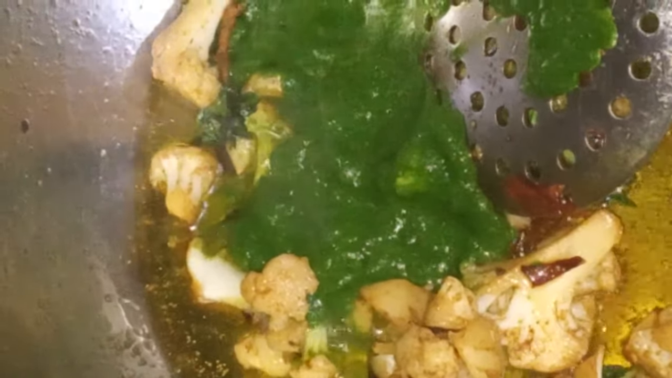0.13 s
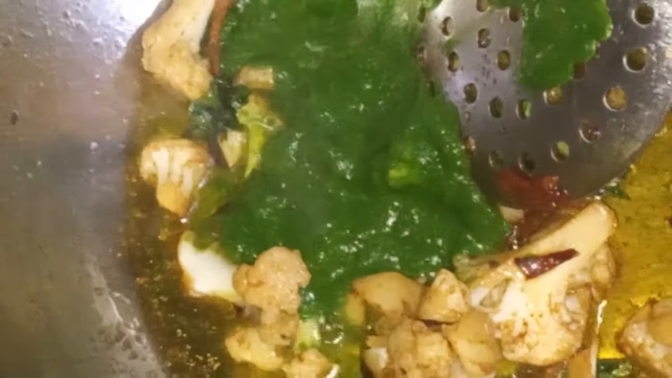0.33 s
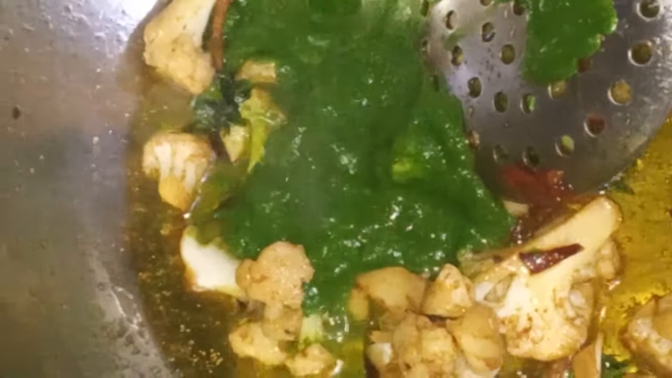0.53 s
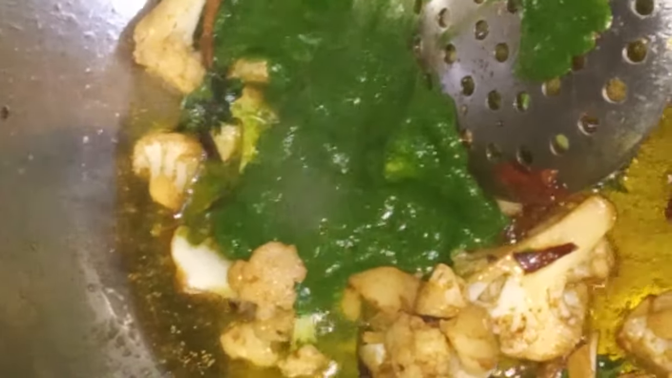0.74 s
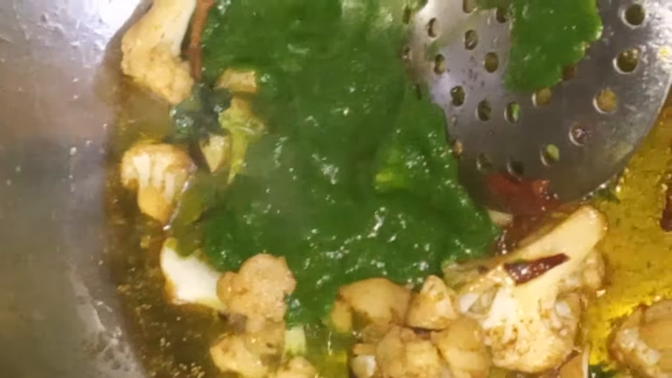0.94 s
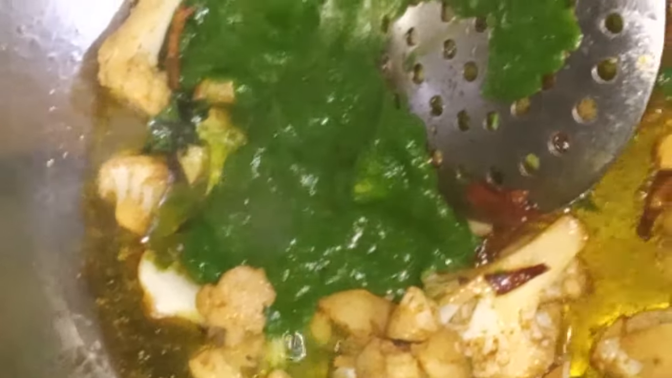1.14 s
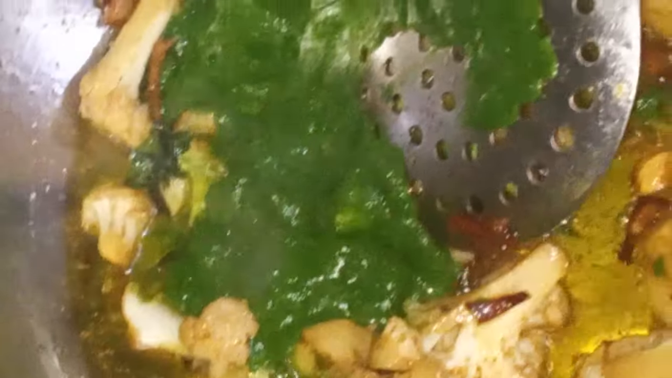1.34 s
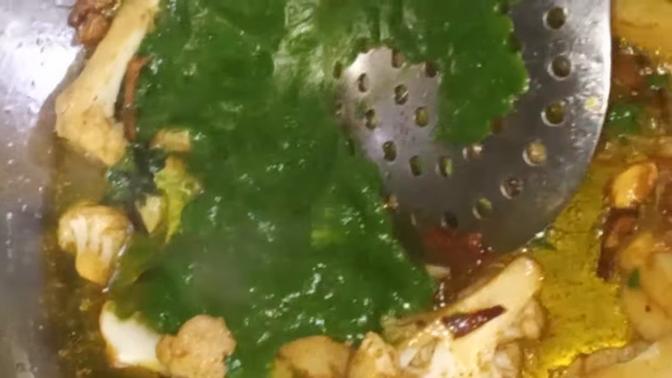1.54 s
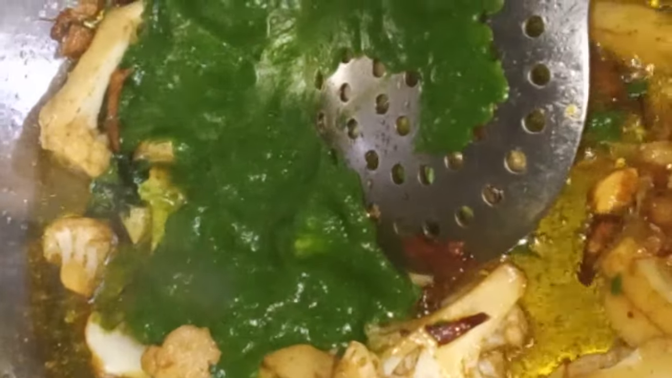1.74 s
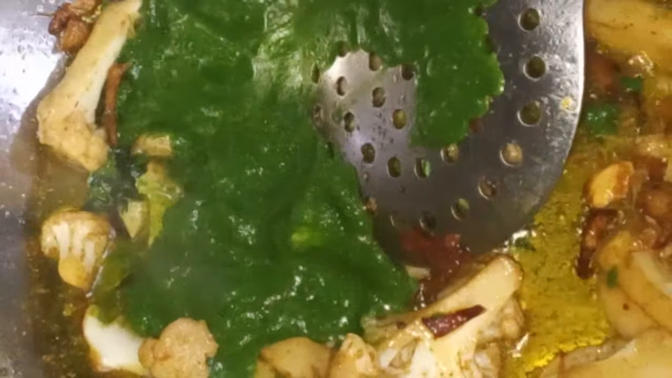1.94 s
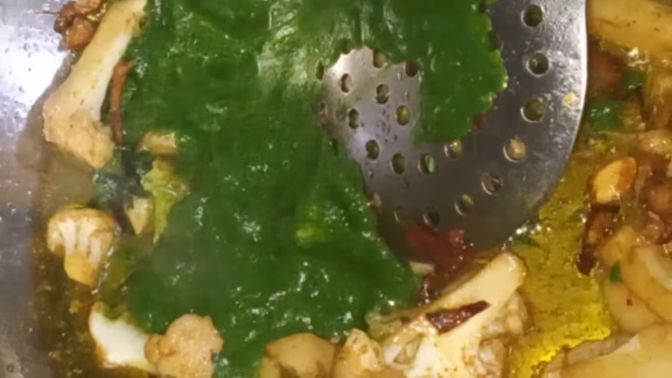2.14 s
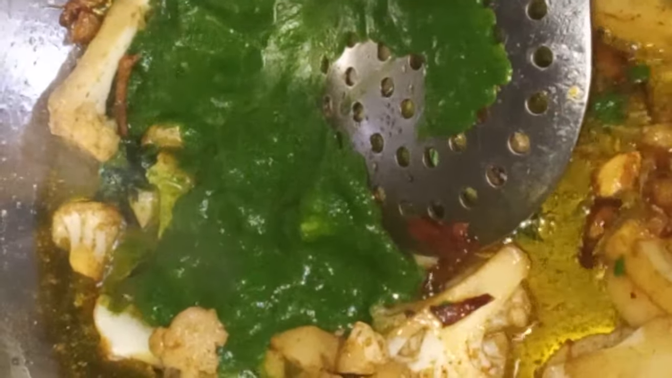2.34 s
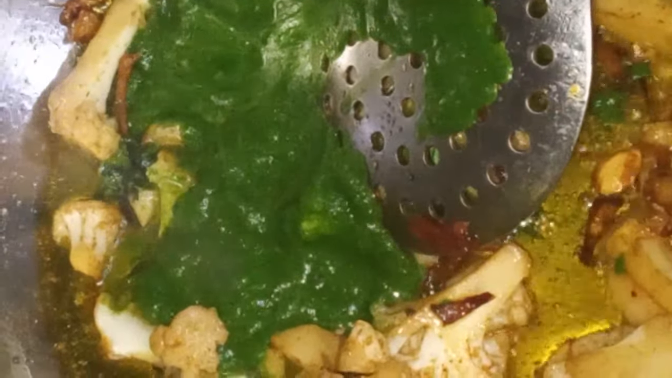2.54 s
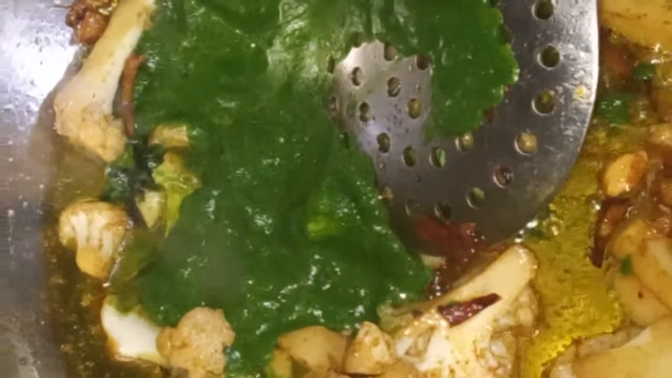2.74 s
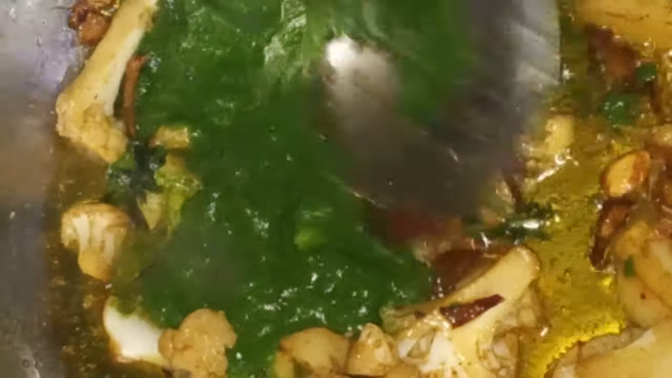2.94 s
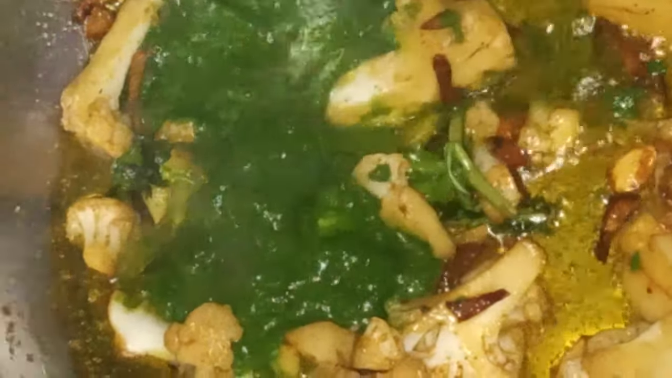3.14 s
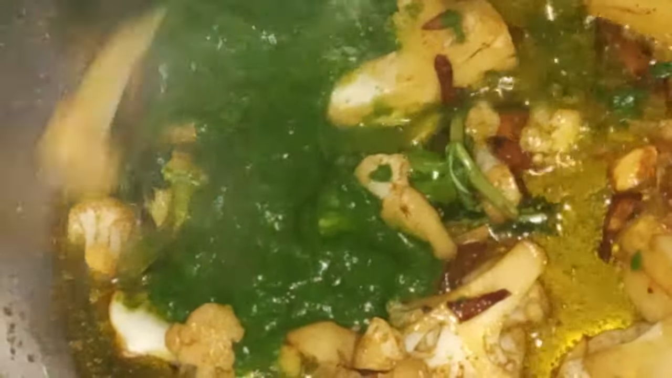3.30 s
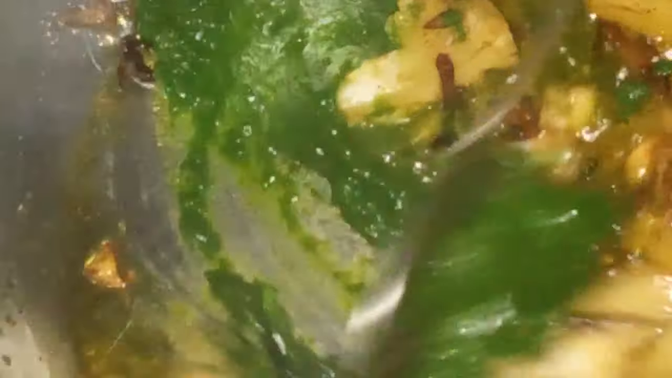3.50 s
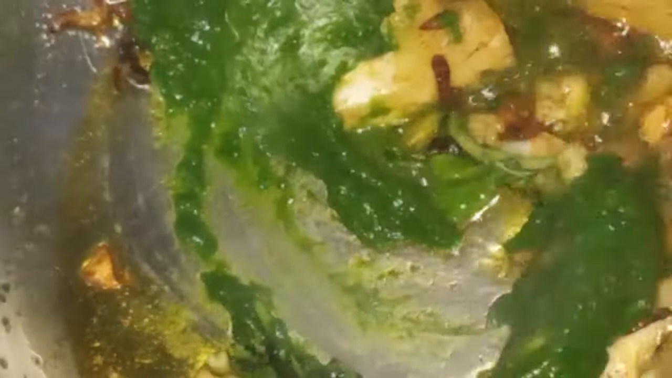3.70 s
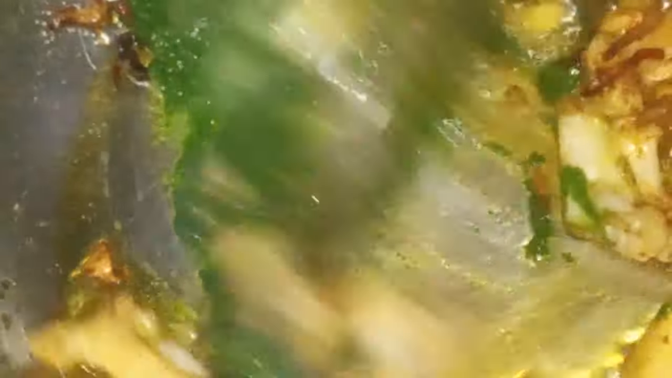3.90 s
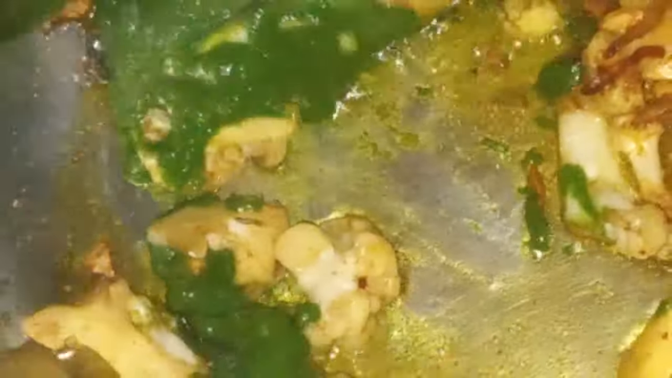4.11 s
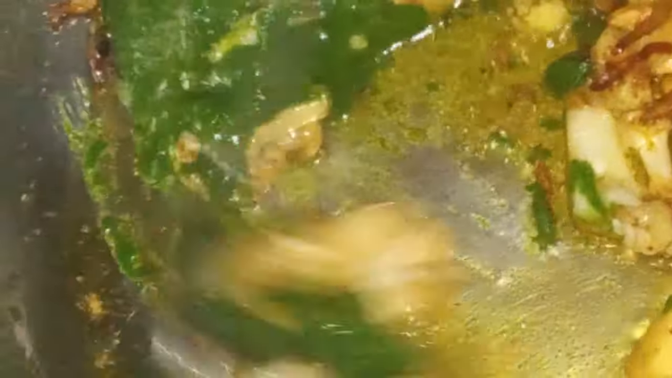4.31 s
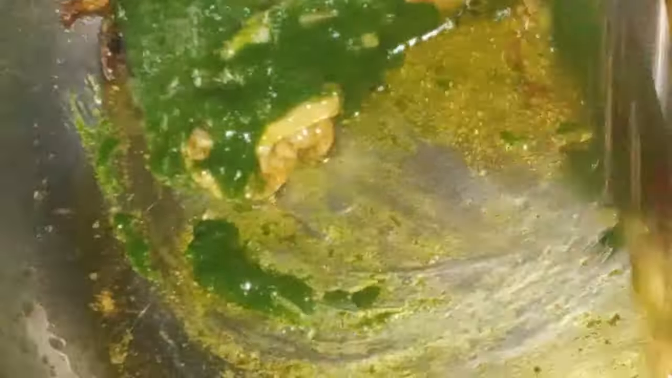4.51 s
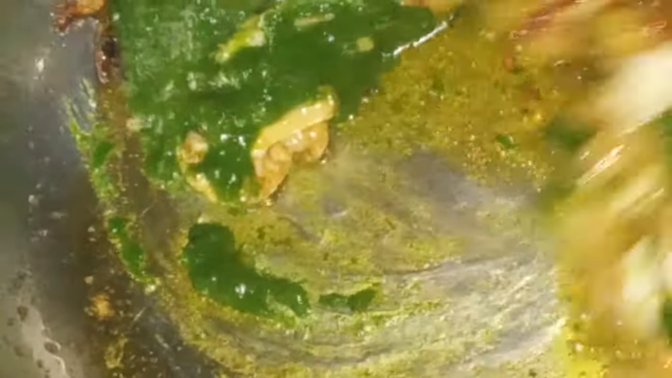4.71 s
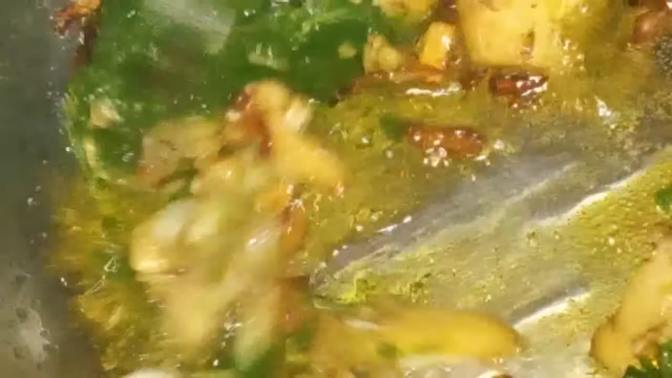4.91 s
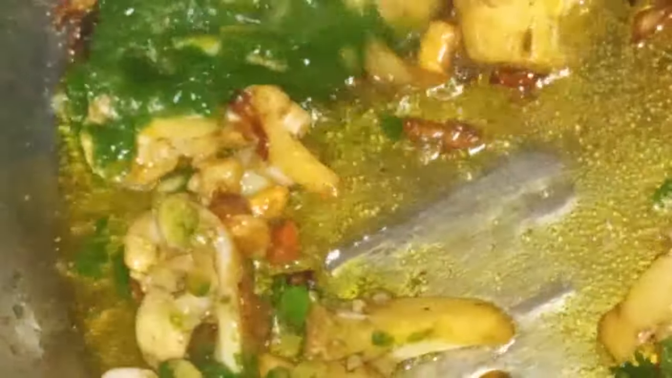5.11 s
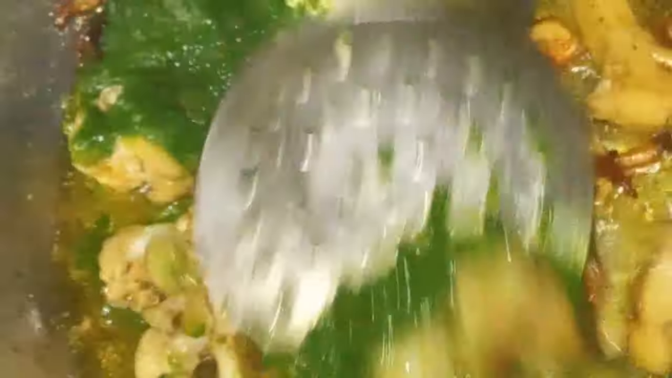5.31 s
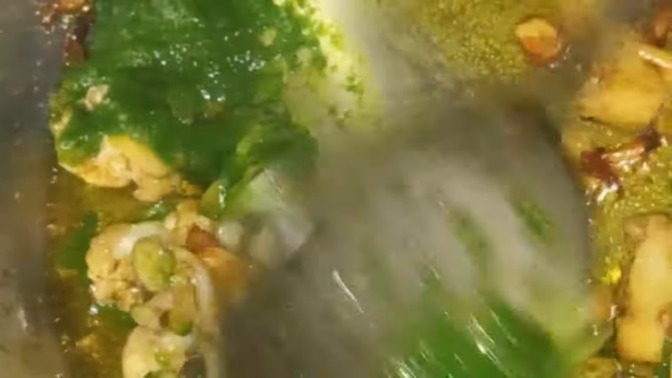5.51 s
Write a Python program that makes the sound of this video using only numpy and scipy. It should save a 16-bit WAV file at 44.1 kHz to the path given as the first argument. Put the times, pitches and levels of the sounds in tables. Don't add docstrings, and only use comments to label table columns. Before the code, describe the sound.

Steady bright frying sizzle in a steel pan, then from three seconds a metal skimmer taps, clangs and scrapes the bottom.

```python
import sys
import numpy as np
from scipy import signal
from scipy.fft import rfft, irfft, next_fast_len
from scipy.io import wavfile
from scipy.ndimage import uniform_filter1d

SR = 44100
rng = np.random.default_rng(int(sys.argv[2]) if len(sys.argv) > 2 else 0)


def voltage_ratio(level):
    return 10 ** (np.asarray(level, float) / 20)


def unload_audio(sound):
    columns = np.transpose(np.atleast_2d(sound))
    steps = np.round(np.clip(columns, -1, 1) * 32767)
    wavfile.write(sys.argv[1], SR, steps.astype(np.int16))


N = 244755

# t/s, level/dB
HUM_SURGES = [
    (0.1, -80),
    (1.45, -75),
    (2.05, -73),
    (2.83, -78),
    (3.15, -72.5),
    (3.4, -73),
    (4.791, -66),
    (5.102, -74),
]
HUM_REST_DB, HUM_SURGE_S = -81.5, 0.081
# t/s, level/dB
FIZZ = [(0, -57.5), (2.7, -58), (3.15, -55.5), (3.35, -56), (3.6, -55.5), (3.86, -55.5), (3.885, -66),
        (3.95, -52), (4.1, -56), (4.45, -52.5), (4.6, -55), (4.85, -53), (5.0, -52.5), (5.07, -53.5),
        (5.2, -48.5), (5.3, -53.5), (5.4, -54), (5.55, -55)]
# f/Hz, level per Hz/dB
FIZZ_COLOUR = [(60, -26.5), (200, -17.5), (480, -19.5), (1000, -20), (2000, -13), (4000, -12.5), (5200, -8),
               (6400, -2), (8300, -3.5), (9300, -12), (13600, -15), (15000, -6.5), (15750, -2),
               (16100, -51)]
# f/Hz, width/Hz, lift/dB
FIZZ_PEAKS = [(350, 79, 6.5), (753, 200, 9.5), (1356, 117, 9.5), (2575, 260, 5), (3620, 11, 13.5),
              (5520, 1000, 4.5), (11300, 2080, 15.5)]
REST_DB = -57
LARGE_DB, LARGE_PER_DB = 3.5, -1.15
FINE_DB, FINE_PER_DB = -4, 0.6
# f/Hz, width/Hz, rate/(1/s), level against the fizz/dB
POPS = [(3200, 2500, 80, -26), (6000, 3500, 200, -14), (8000, 3000, 150, -17), (11300, 4000, 200, -15),
        (15200, 2500, 120, -21)]
# t/s, peak level/dB, t60/s
JETS = [(0.2194, -54, 0.072), (0.5162, -53, 0.071), (1.0094, -53.5, 0.29), (1.1344, -49.5, 0.16),
        (1.4094, -48.5, 0.15), (1.5, -57, 0.47), (1.5494, -54, 0.11), (1.5794, -50, 0.21),
        (1.6826, -48.5, 0.13), (1.707, -59, 0.07), (2.0911, -56, 0.33), (2.1316, -53, 0.085),
        (2.3464, -54, 0.059), (2.4793, -45.5, 0.054)]
JET_HZ = 3623
# t/s, peak level/dB, f/Hz
HISSES = [
    (3.1807, -66, 4700),
    (3.3134, -53, 4770),
    (3.7264, -46, 4800),
    (3.7605, -50, 4860),
    (4.3221, -49, 5080),
    (5.256, -54, 5000),
]
# t/s, peak level/dB, f/Hz
SPITS = [(1.374, -40, 5700), (1.4721, -45, 7110), (2.8843, -36.5, 11300), (3.5124, -38, 6200),
         (3.709, -37.5, 6540), (4.112, -42, 8270), (4.1694, -66, 12100), (4.3186, -53, 6200),
         (4.357, -46, 6200), (4.9272, -34, 11600), (4.989, -35, 5900), (5.254, -26.5, 4940),
         (5.3005, -30, 6000), (5.366, -35, 5450), (1.291, -43, 2960), (4.1694, -46, 6800),
         (5.198, -29, 11300), (5.222, -31, 11000), (5.254, -45, 2980), (1.273, -45, 2700)]
# t/s, peak level/dB, f/Hz, t60/s
THUMPS = [
    (0.02, -56.5, 281, 0.072),
    (1.344, -44.5, 239, 0.28),
    (1.387, -52, 263, 0.36),
    (1.437, -52, 245, 0.14),
    (1.955, -59, 261, 0.28),
    (2.299, -58, 223, 0.13),
    (2.69, -60, 230, 0.13),
    (3.776, -53, 348, 0.07),
]
# t/s, peak level/dB, f/Hz, t60/s
MOANS = [(1.137, -53, 800, 0.075), (2.174, -40, 1635, 0.19), (2.255, -56, 523, 0.21),
         (3.408, -33.5, 653, 0.21), (3.799, -52, 765, 0.16), (3.845, -42.5, 770, 0.075),
         (4.765, -33, 343, 0.35), (5.127, -33, 375, 0.022), (5.151, -30.5, 1422, 0.074),
         (3.765, -51, 750, 0.26), (4.385, -46, 2270, 0.57), (4.53, -49, 2195, 1), (4.6, -49.5, 1463, 0.31),
         (5.083, -30.5, 583, 0.09), (5.118, -33.5, 1470, 0.053), (1.345, -44.5, 1570, 0.15),
         (2.0, -55.5, 925, 0.23), (4.234, -28.5, 699, 0.04), (3.222, -30, 560, 0.073)]
# t/s, peak level/dB, f/Hz, t60/s
SQUEAKS = [(0.0832, -50, 2660, 0.018), (2.5376, -51.5, 2950, 0.055), (3.8212, -43.5, 3480, 0.23),
           (4.4564, -44.5, 2840, 0.22), (4.5446, -46.5, 3620, 0.49), (4.6374, -42.5, 3730, 0.5),
           (4.7591, -39, 3740, 0.34), (5.1921, -30.5, 2520, 0.033), (5.3757, -45, 3410, 0.27),
           (5.4204, -30, 3710, 0.14), (5.4311, -28, 3735, 0.21), (5.4464, -35.5, 3690, 0.3),
           (5.478, -33.5, 3550, 0.2), (5.5094, -41, 3850, 0.11), (5.5294, -38, 3600, 0.17),
           (4.468, -40, 3160, 0.2), (5.425, -43, 4310, 0.46), (5.49, -44, 4100, 0.2),
           (4.8, -35, 3960, 0.19), (1.31, -50, 3300, 0.092), (4.03, -48, 3780, 0.16),
           (1.69, -54, 2780, 0.22), (3.222, -37.5, 3110, 0.12)]
# t/s, peak level/dB, f/Hz, t60/s
WHISTLES = [(3.708, -41, 6840, 0.14), (4.3094, -53, 6220, 0.16), (4.3585, -42, 6250, 0.57),
            (4.3994, -46, 5900, 0.18), (4.8533, -37, 6100, 0.06), (4.8918, -39, 6320, 0.073),
            (5.1188, -31.5, 7860, 0.052), (5.1483, -31, 7520, 0.056), (5.2694, -38.5, 5820, 0.28),
            (5.3744, -41.5, 5380, 0.092), (5.4985, -45, 6700, 0.14), (5.115, -31.5, 7000, 0.11),
            (4.8, -47, 6000, 0.25), (3.891, -24.5, 6330, 0.089), (3.92, -29, 7260, 0.19),
            (3.99, -40, 6000, 0.16)]
# t/s, peak level/dB, f/Hz
BOUNCES = [(3.8905, -22, 2320), (3.8925, -19, 6350), (3.8995, -19, 2170), (3.9015, -20.5, 1060),
           (3.925, -35, 2300), (3.2755, -33, 1100), (4.228, -49, 1100), (4.32, -38, 11300),
           (5.8, -31.5, 5800), (5.079, -20, 2200), (5.068, -38, 7500), (4.802, -32, 2200),
           (0.442, -48, 6050), (1.8, -38, 6090), (1.8, -42, 6200), (3.147, -44, 5200), (4.2, -42, 8700),
           (4.1, -39, 2000), (3.891, -28, 15300), (4.683, -34, 14500), (5.079, -31, 18000),
           (4.6825, -28, 1920), (4.8015, -28.5, 1360), (3.466, -42, 1400), (4.972, -42, 6200),
           (4.977, -38, 5300), (5.001, -42, 6300), (5.011, -41, 5800), (5.022, -42, 6300),
           (5.037, -43, 5600), (5.327, -42, 5500), (5.3, -40, 4400), (1.53, -49, 1100), (4.455, -41, 7500),
           (4.3, -40, 7000), (6.3, -40, 2300)]
# t/s, peak level/dB, f/Hz, t60/s
RATTLES = [(4.7, -37, 7100, 0.096), (4.236, -40, 3180, 0.044), (4.695, -32.5, 4570, 0.24),
           (4.71, -41, 3700, .2), (4.73, -35, 5100, .2), (3.2, -38, 4500, 0.22), (4.81, -40, 5000, .25),
           (4.84, -40, 5100, .15), (5.082, -34, 4650, 0.041), (5.086, -27, 7100, 0.076),
           (6.9, -33.5, 7800, 0.18), (5.192, -35, 6700, 0.15), (5.195, -36, 4840, 0.13),
           (4.8, -48, 2200, 0.11), (7.3, -33, 5200, 0.13), (5.29, -41, 6900, 0.087),
           (5.145, -39, 5000, 0.12), (3.93, -28, 1040, 0.29), (4.5, -40, 2200, 0.17),
           (3.85, -39, 3440, 0.099), (4.96, -56, 3150, 0.22), (3.223, -35, 8700, 0.09),
           (3.25, -40, 9500, 0.095), (4.395, -45, 4600, 0.32), (4.945, -52, 1450, 0.36),
           (4.8, -45, 1410, 0.55), (5.27, -46, 2600, 0.25), (5.35, -51.5, 1980, .3),
           (1.31, -49.5, 2710, .4), (1.4, -49.5, 4200, .3), (1.98, -55, 1840, 0.26), (4.3, -47, 2370, .2),
           (3.895, -36, 15600, 0.18), (3.49, -48, 4100, .2), (4.03, -40, 1100, .3), (4.236, -37, 1100, .12),
           (4.57, -46, 2250, .25), (5.11, -38, 5000, .15), (5.15, -36, 7600, .3), (5.1, -38, 3200, .2),
           (5.4, -44, 4100, .15), (0.99, -54, 3650, .2), (1.1, -52, 3650, .15), (3.94, -33, 4600, .35),
           (3.96, -34, 3100, .3), (4.39, -46, 7400, .3), (4.45, -45, 6800, .2), (4.63, -46, 4700, .2),
           (3.79, -50, 1100, .3)]
# f/Hz, width/Hz, level/dB
BOWL = [(291, 31, -4), (322.7, 7.3, 5.5), (360, 51, 7), (400, 18, -3), (439, 6, 3), (607, 42, -6),
        (655, 40, 2.5), (689, 50, -9.5)]
# f/Hz, width/Hz, level/dB
WALL = [(835, 7.2, 8), (1015, 22, -9), (1040, 12.2, 6), (1249, 21, 4), (1334, 50, 3), (1520, 310, -4.5),
        (1790, 140, -42), (1910, 190, 13.5), (1970, 49, -36), (2270, 13.3, -16), (2520, 32, 8),
        (2630, 44, -18)]
LOWER_WALL = WALL[:6]
# f/Hz, width/Hz, level/dB
RUBBED_WALL = [(765, 35, 4), (997, 160, -8.5), (1437, 170, 2.5), (1845, 99, -3.5), (2206, 180, 2),
               (2560, 14, -4.5)]
# f/Hz, width/Hz, level/dB
BARE_WALL = [(868, 66, 0.5), (984, 28, -1), (1045, 61, 4), (1171, 40, 5), (1290, 105, -3), (1440, 97, -11),
             (1565, 27, 1), (1780, 26, -10), (1933, 100, -3), (2184, 77, 4), (2290, 33, 1), (2440, 51, 0.5),
             (2700, 34, -5)]
# f/Hz, width/Hz, level/dB
FLOOR = [(2960, 19, 5.5), (3140, 140, -8), (3447, 264, 2.5), (3850, 360, 1.4), (4230, 76, 3),
         (4600, 275, 3.5), (4970, 145, 0), (5450, 120, -2), (5790, 350, 1), (6146, 81, 3.5)]
# f/Hz, width/Hz, level/dB
BLADE = [(8650, 230, 0.5), (7260, 40, -29), (7330, 110, 8), (9660, 580, -6.5), (7980, 210, 9),
         (10300, 530, -2.5), (11300, 420, -1), (13200, 1500, -30), (14100, 790, -13)]
FAMILY_HZ = (400, 1500, 4000, 8500)
# start t/s, length/s, push level/dB, peak place/(0-1), bare steel/(0-1)
STROKES = [(3.233, 0.043, -34, 0.01, 0.15), (3.285, 0.12, -41.5, 0.14, 0), (3.385, 0.2, -44, 0.09, 0.07),
           (3.45, 0.16, -46.5, 0.27, 0.57), (3.631, 0.16, -47, 0.6, 0.61), (3.724, 0.16, -44.5, 0.76, 0.62),
           (4.242, 0.11, -40.5, 0.12, 0.07), (4.367, 0.088, -45.5, 0.35, 0.67),
           (4.426, .09, -45, 0.47, 0.67), (4.487, 0.25, -47, 0.74, 0.67), (4.685, 0.066, -32.5, 0, 0.31),
           (4.7, 0.1, -42, 0.88, 0.66), (4.81, 0.11, -42.5, 0, 0.47), (4.867, 0.14, -51, 0.33, 0.61),
           (5.085, 0.15, -35.5, 0.21, 0.17), (5.106, 0.059, -43.5, 0.97, 0.03),
           (5.161, 0.11, -34.5, 0.35, 0.5), (5.24, 0.16, -42.5, 0.26, 0.61), (5.338, 0.2, -56.5, 0.3, 0.57),
           (5.446, 0.18, -51.5, 0.4, 0.61), (3.901, 0.13, -36.5, 0.37, 0.66), (4.7, 0.16, -42, 0.52, 0.63),
           (3.808, 0.075, -51, 0.86, .5), (4.8, 0.067, -42.5, 0.05, 0.58)]
# start t/s, length/s, push level/dB, peak place/(0-1), bare steel/(0-1)
NUDGES = [
    (0.0, 0.082, -63.5, 0, 0),
    (0.361, 0.16, -54, 0.4, 0.26),
    (1.257, 0.22, -47.5, 0.65, 0.31),
    (1.925, 0.15, -49.5, 0.62, 0.28),
    (2.183, 0.12, -54.5, 0.3, 0.41),
    (2.232, 0.11, -59.5, 0.36, 0.22),
    (2.614, .18, -63.5, 0.55, 0.08),
    (1.267, 0.21, -54, 0.17, 0.73),
]
STROKE_FADE_DB, STROKE_CURVE = 21, 1.4
FULL_PUSH_DB = -18.5
BARE_OCTAVES = 4.4
BELOW_PER_OCTAVE, ABOVE_PER_OCTAVE = 0.34, 0.31
# t/s, wall peak level/dB, then bowl, floor, blade level against the wall/dB
TAPS = [
    (3.219, -25.5, 2.5, -1, 2),
    (4.682, -26.5, -2, -4.5, 6.5),
    (4.801, -23, -3, -8.5, -28),
    (5.078, -20.5, -2.5, 1.5, 6),
]
# t/s, wall peak level/dB, then bowl, floor, blade level against the wall/dB
THUDS = [
    (3.2745, -32, 12.5, -15, -8),
    (3.466, -40, -5, -20, -25),
    (4.2324, -29, 0, -6.5, -20),
    (4.801, -29, 5, -1, -21),
]
# t/s, wall peak level/dB, then bowl, floor, blade level against the wall/dB
CLANGS = [
    (1.3, -31.5, -45, -11, -31),
    (2.172, -40.5, -39, -9, -10),
]
# t/s, wall peak level/dB, then bowl, floor, blade level against the wall/dB
BARE_CLANG = [
    (3.89, -13.5, -12.5, -2.5, -4.5),
]
EDGE_HZ, BURST_EDGE_HZ = 15950, 16700


def evened(x):
    return x / np.sqrt(np.mean(x ** 2) + 1e-20)


def add(mix, s, sound):
    part = mix[max(round(s * SR), 0):][:len(sound)]
    part += sound[:len(part)]


def ring(x, modes, widen=0.5):
    size = next_fast_len(x.shape[-1] + 8192)
    hz = np.fft.rfftfreq(size, 1 / SR)
    f, width, db = np.transpose(modes)[:, :, None]
    gain = voltage_ratio(db) / (1 + 2j * (hz - f) / np.maximum(width * widen, 5)) ** 2
    return irfft((rfft(x, size) * gain).sum(0), size)[:x.shape[-1]]


def crackle(count, per_s, spread_db):
    size = voltage_ratio(spread_db * np.minimum(rng.exponential(1, count), 3.5))
    struck = rng.random(count) < per_s / SR
    return evened(size * struck * rng.standard_normal(count))


def kitchen_hum():
    t = np.arange(N) / SR
    level = voltage_ratio(HUM_REST_DB)
    for s, db in HUM_SURGES:
        level = level + voltage_ratio(db) * np.exp(-((t - s) / HUM_SURGE_S) ** 2)
    return level * evened(ring(rng.standard_normal(N), [(112.0, 74, 0)]))


def fizz():
    source = rng.standard_normal(N) + 0.3 * crackle(N, 1500, 3.2)
    hz, t, z = signal.stft(source, SR, nperseg=1024, noverlap=768)
    patches = uniform_filter1d(rng.standard_normal(z.shape), size=7, axis=0)
    patches = evened(uniform_filter1d(patches, size=9, axis=1))
    patches = 3.2 * np.tanh(patches / 3.2)
    flicker = evened(uniform_filter1d(rng.standard_normal(len(t)), size=6))

    f, db = np.transpose(FIZZ_COLOUR)
    colour_db = np.interp(np.log(hz + 1), np.log(f), db)
    for centre, width, lift_db in FIZZ_PEAKS:
        colour_db = colour_db + lift_db / (1 + (2 * (hz - centre) / width) ** 2)

    s, level_db = np.transpose(FIZZ)
    large_db = np.interp(t, s, LARGE_DB + LARGE_PER_DB * (level_db - REST_DB))
    fine_db = np.interp(t, s, FINE_DB + FINE_PER_DB * (level_db - REST_DB))
    low = 1 / (1 + (hz[:, None] / 4700) ** 8)
    high = 1 / (1 + (13800 / (hz[:, None] + 1)) ** 24)
    patch_db = 1.3 * (1.5 + 0.36 * low) * patches
    z = z * voltage_ratio(colour_db[:, None] + patch_db + 0.55 * flicker + low * large_db + high * fine_db)
    hiss = evened(signal.istft(z, SR, nperseg=1024, noverlap=768)[1][:N])
    return hiss * voltage_ratio(np.interp(np.arange(N) / SR, s, level_db) + 6.0)


def pops():
    ticks = np.zeros(N)
    for hz, width, per_s, db in POPS:
        ticks += voltage_ratio(db) * evened(ring(crackle(N, per_s, 1.2), [(hz, width, 0)]))
    s, level_db = np.transpose(FIZZ)
    return ticks * voltage_ratio(np.interp(np.arange(N) / SR, s, level_db) + 5.5)


def puff(db, hz, rise, t60, width_hz):
    t = np.arange(SR // 3) / SR
    tone = ring(rng.standard_normal(len(t)), [(hz, width_hz, 0)])
    shape = (1 - np.exp(-t / rise)) * voltage_ratio(-60 * t / t60)
    sound = evened(tone) * shape
    return voltage_ratio(db) * sound / abs(sound).max()


def steam_and_spits(pan):
    for s, db, t60 in JETS:
        add(pan, s - .002, puff(db, JET_HZ, 0.01, t60, width_hz=320))
    for s, db, hz in HISSES:
        add(pan, s - .002, puff(db, hz, 0.0077, 0.11, width_hz=110))
    for s, db, hz in SPITS:
        add(pan, s - .001, puff(db, hz, 0.0002, 0.02, width_hz=2300))


def thumps_and_rubbing(pan):
    kinds = ((THUMPS, .013, 80), (MOANS, .007, 160), (SQUEAKS, .008, 340), (WHISTLES, .008, 520))
    for table, rise, width_hz in kinds:
        for s, db, hz, t60 in table:
            add(pan, s - .002, puff(db, hz, rise, t60, width_hz))


def blade_chatter(pan):
    for s, db, hz in BOUNCES:
        add(pan, s - .001, puff(db, hz, 0.00023, 0.016, width_hz=2000))
    for s, db, hz, t60 in RATTLES:
        add(pan, s - .002, puff(db, hz, 0.0042, t60, width_hz=870))


def drag(length, push_db, peak, bare):
    t = np.arange(0, length, 1 / SR)
    top = np.clip(peak, .02, .98) * t[-1]
    away = np.where(t < top, 1 - t / top, (t - top) / (t[-1] - top))
    hand_db = push_db - STROKE_FADE_DB * away ** STROKE_CURVE

    octaves = np.log2(np.array(FAMILY_HZ) / FAMILY_HZ[0]) - BARE_OCTAVES * bare
    slack_db = max(FULL_PUSH_DB - push_db, 0)
    loss = np.where(octaves < 0, -BELOW_PER_OCTAVE * octaves, ABOVE_PER_OCTAVE * octaves)
    levels = -slack_db * loss

    grit = rng.standard_normal(SR // 3) + .9 * crackle(SR // 3, 1000, 2.6)
    grit = grit[:len(t)]
    knots = np.arange(-.03, .36, .03)
    out = 0
    for modes, db in zip((BOWL, RUBBED_WALL, FLOOR, BLADE), levels):
        wander = [np.interp(t, knots, row) for row in rng.standard_normal((len(modes), len(knots)))]
        sound = ring(grit * voltage_ratio(4.0 * np.array(wander)), modes, widen=1.85)
        local = np.sqrt(uniform_filter1d(sound ** 2, size=4000) + 1e-20)
        out = out + voltage_ratio(hand_db + db) * sound / local
    return out * signal.windows.tukey(len(t), .003 / t[-1])


def tap(wall_db, bowl_db, floor_db, blade_db, t60, blow, spot_spread_db, wall=WALL, bend=0.74, rise=0.0001):
    t = np.arange(SR // 3) / SR
    out = 0
    # resonances, level/dB, share of t60, crack decay/s
    families = ((BOWL, bowl_db, 0.96, 0.0018), (wall, 0, 0.85, 0.0011),
                (FLOOR, floor_db, 0.74, 0.0031), (BLADE, blade_db, 0.44, 0.0084))
    for modes, db, last, crack in families:
        spot, hold = rng.standard_normal((2, len(modes), 1))
        noise = rng.standard_normal((2, len(t)))
        age = t / (t60 * last * 0.77 ** hold)
        rattle = voltage_ratio(spot_spread_db * spot - 60 * age ** bend)
        body = ring(noise[0] * rattle, modes, widen=1.93)
        knock = ring(noise[1] * np.exp(-t / crack), modes, widen=3.42)
        sound = body / abs(body).max() + blow * knock / abs(knock).max()
        out = out + voltage_ratio(wall_db + db) * sound / abs(sound).max()
    return out * np.minimum(t / rise, 1)


def skimmer(pan):
    for s, *row in STROKES + NUDGES:
        add(pan, s, drag(*row))
    for s, *row in TAPS:
        add(pan, s, tap(*row, t60=0.22, blow=1.74, spot_spread_db=-0.5))
    for s, *row in THUDS:
        add(pan, s, tap(*row, t60=0.072, blow=1.18, spot_spread_db=1.0, wall=LOWER_WALL, rise=.0008))
    for s, *row in CLANGS:
        add(pan, s, tap(*row, t60=0.3, blow=0.38, spot_spread_db=6.0, rise=0.0075))
    for s, *row in BARE_CLANG:
        add(pan, s, tap(*row, t60=0.31, blow=1.5, spot_spread_db=0.5, wall=BARE_WALL, bend=1.57))


def scene():
    steady = kitchen_hum() + fizz() + pops()
    pan = np.zeros(N)
    steam_and_spits(pan)
    thumps_and_rubbing(pan)
    blade_chatter(pan)
    skimmer(pan)
    no_bass = signal.butter(5, 215, "high", fs=SR, output="sos")
    return (signal.sosfilt(no_bass, pan) + steady)[None]


def low_pass(x):
    return signal.sosfilt(signal.butter(12, 16990, fs=SR, output="sos"), x)


def below(x, hz):
    taps = signal.firwin(511, hz, window=("kaiser", 9), fs=SR)
    return signal.oaconvolve(x, taps[None], "same")


def record(dry):
    narrow, wide = below(dry, EDGE_HZ), below(dry, BURST_EDGE_HZ)
    power = uniform_filter1d((dry - narrow) ** 2, size=500)
    burst = np.clip(power / voltage_ratio(2 * -63) - 1, 0, 1)
    return low_pass(narrow + burst * (wide - narrow))


dry = scene()
out = record(dry)
unload_audio(out)
```